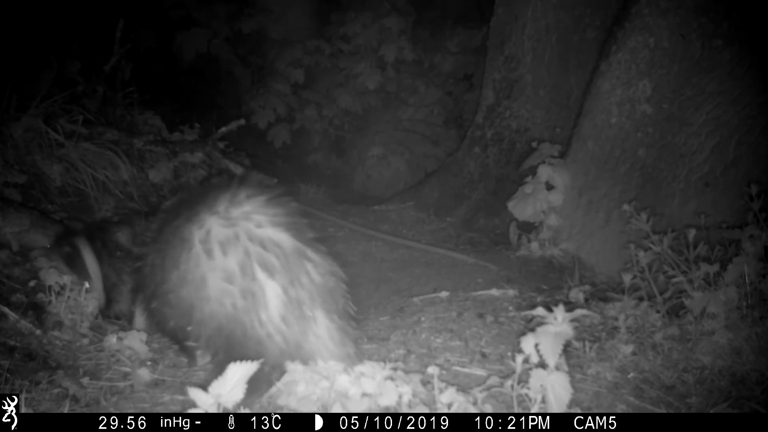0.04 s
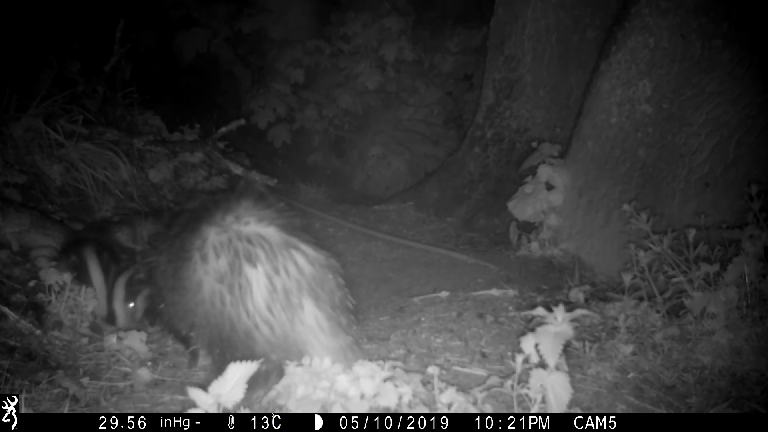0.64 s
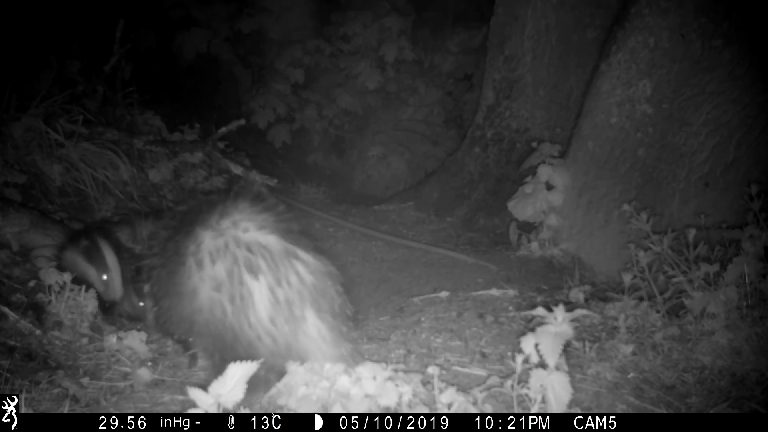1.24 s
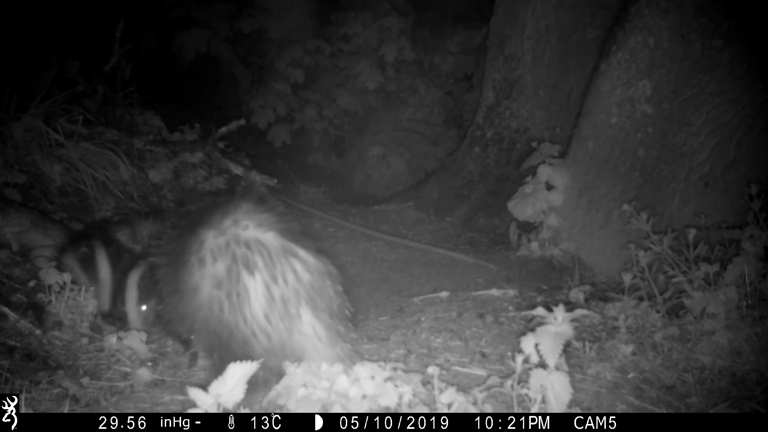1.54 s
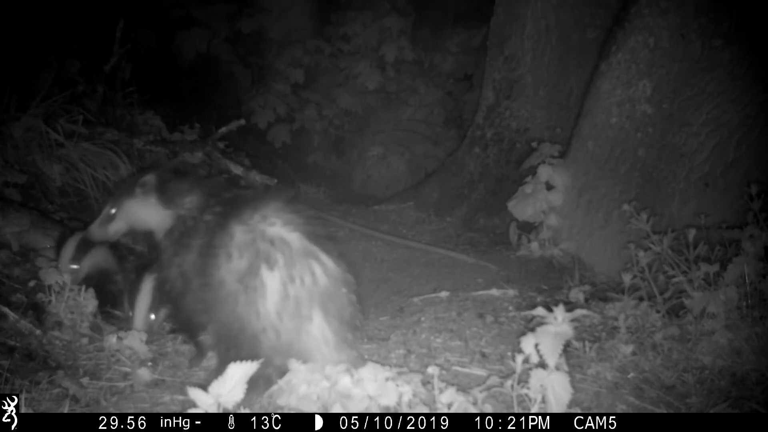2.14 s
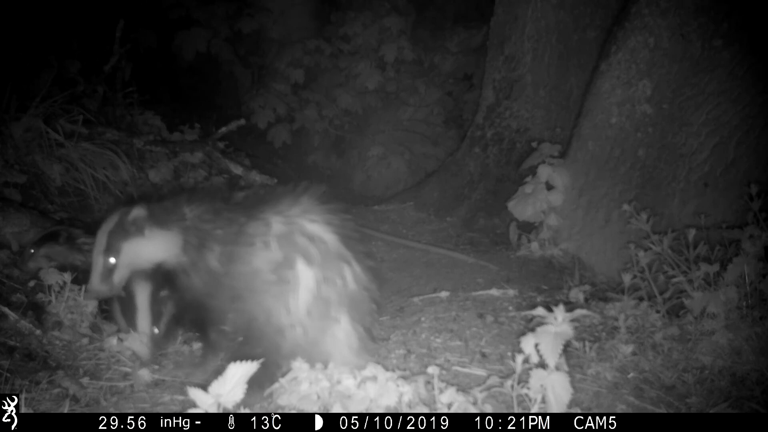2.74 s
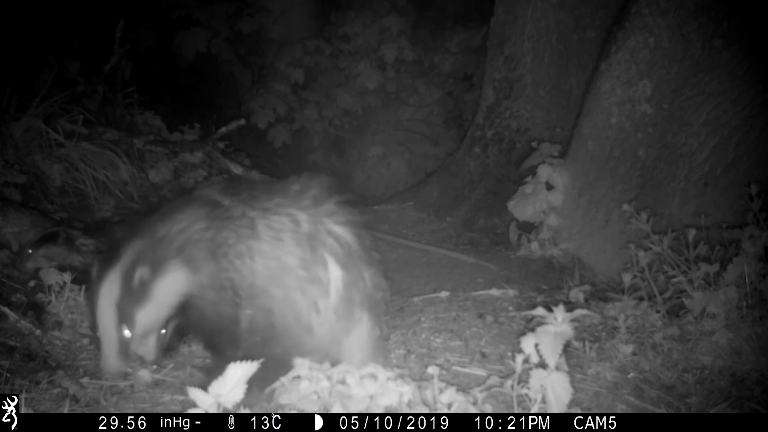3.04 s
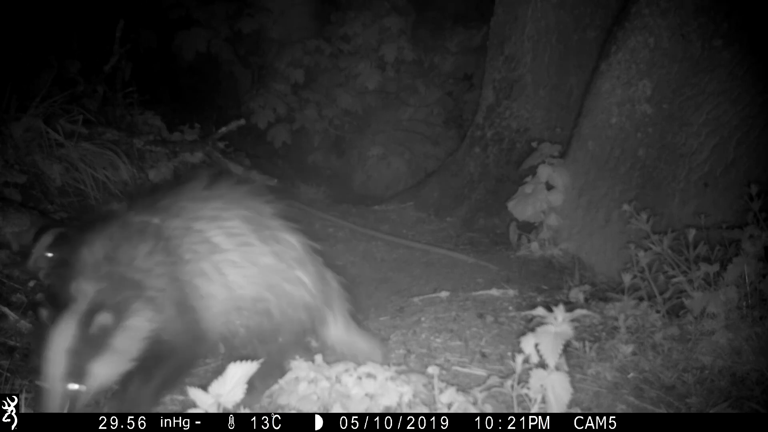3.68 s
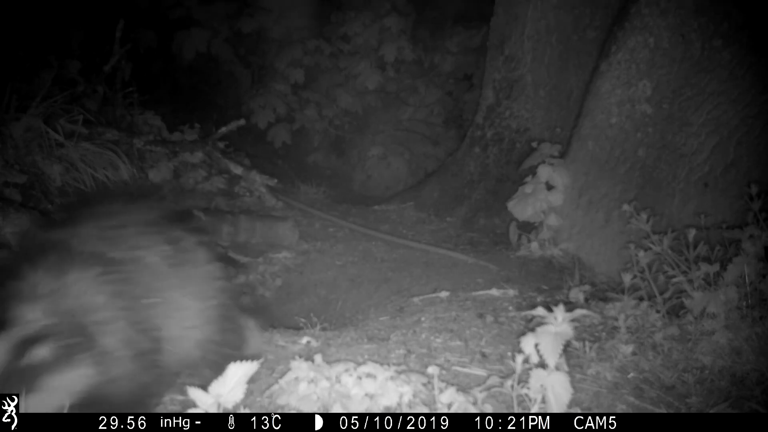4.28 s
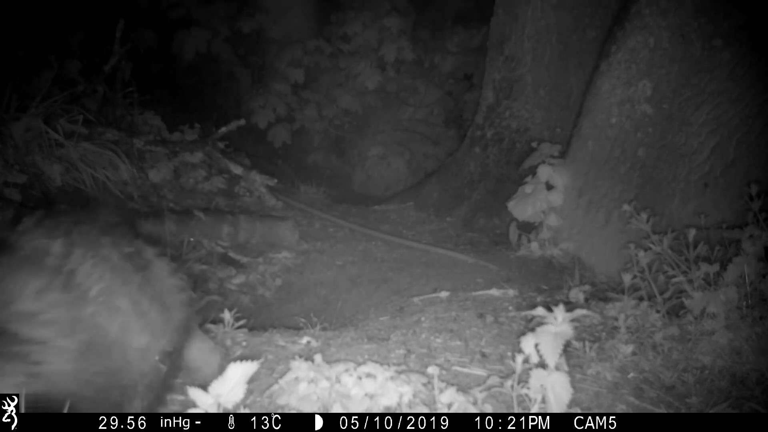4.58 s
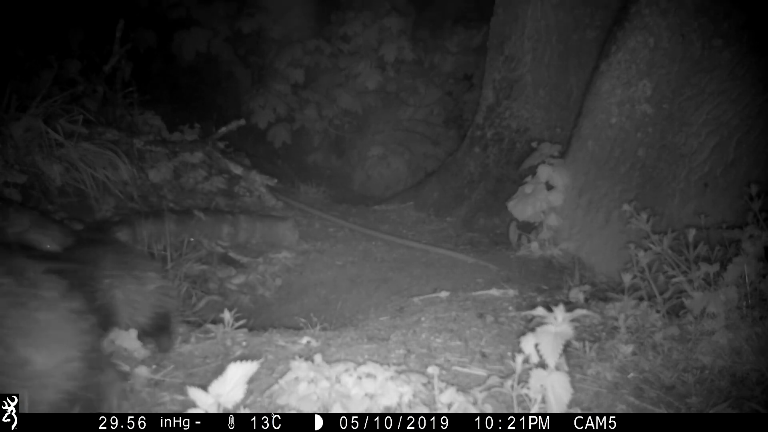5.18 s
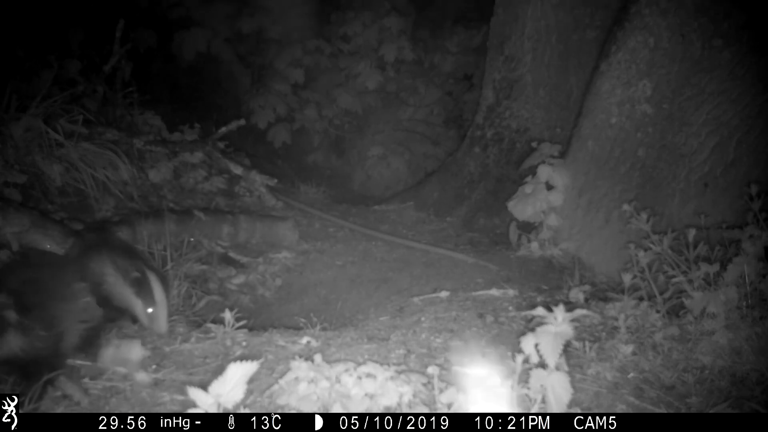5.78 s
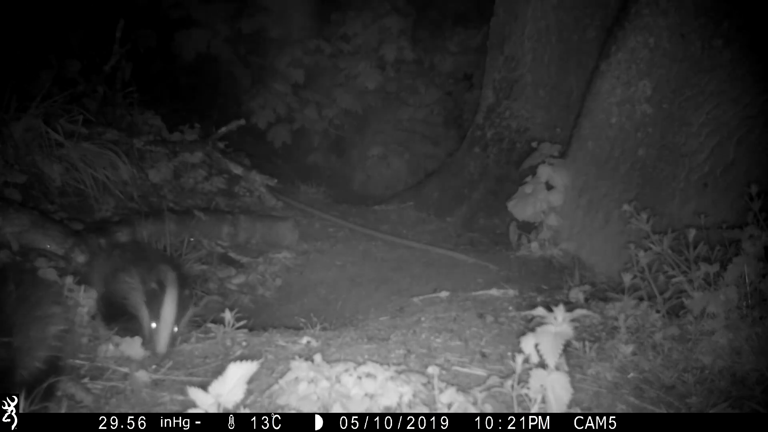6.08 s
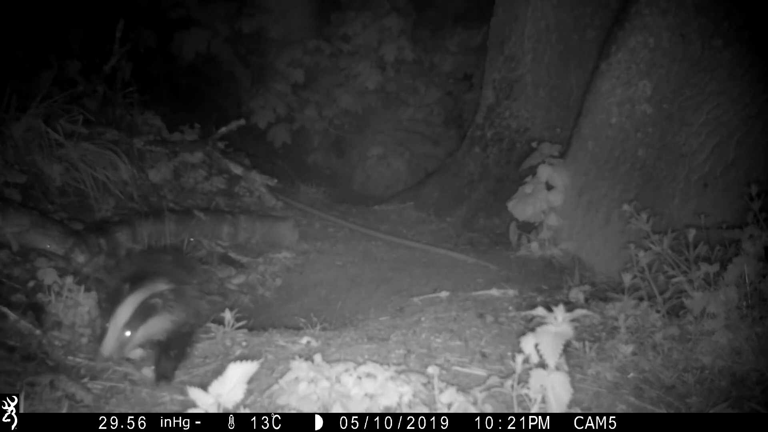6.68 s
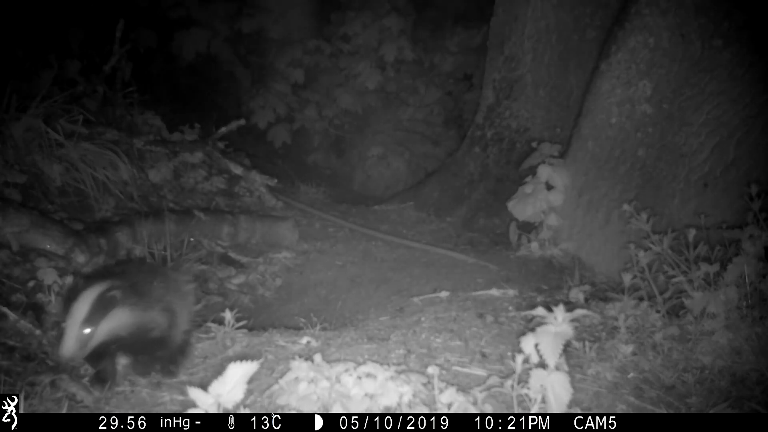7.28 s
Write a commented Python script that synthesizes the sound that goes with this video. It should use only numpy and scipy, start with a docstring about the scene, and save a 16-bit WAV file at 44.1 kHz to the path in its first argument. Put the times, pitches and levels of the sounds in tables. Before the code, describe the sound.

Small twig snaps and one raspy squeak come through the even hiss of a trail camera in a quiet wood at night. After a pause, young badgers nearby let out a harsh yap and four quick, clear yelps. They grunt quietly, crack a dry twig and scuff softly through leaves, yelping twice more near the end. The trees return a slight echo, and a thin electronic whine sits faintly underneath.

```python
"""Among trees at night, badger cubs squabble in front of a trail camera. Their vocal folds make seven
short, clear yelps, one harsh yap and a few low grunts. Their paws snap twigs and scuff dry leaves,
and the trees return a faint echo. The camera adds a steady hiss and a thin electronic whine."""
import sys
import numpy as np
from scipy import signal
from scipy.fft import rfft, irfft
from scipy.io import wavfile

SR = 44100
rng = np.random.default_rng(int(sys.argv[2]) if len(sys.argv) > 2 else 0)


def dump_mix(stems):
    """Bounce the given channels to the path in sys.argv[1] as a 16-bit WAV at rate SR."""
    frames = np.atleast_2d(stems).T  # one column per channel
    limited = np.clip(frames, -1, 1)  # hard clip at full scale
    pcm = np.round(limited * 32767).astype(np.int16)
    wavfile.write(sys.argv[1], SR, pcm)


N = 331632


def gain_of(db):
    """Turns decibels into a multiplier."""
    return 10 ** (np.asarray(db) / 20)


def evened(x):
    """Scales a signal to an average strength (rms) of 1."""
    return x / np.sqrt(np.mean(x ** 2) + 1e-20)


def level_at(curve, hz):
    """Looks up a level between the (frequency_hz, level_db) points of a curve."""
    points_hz, levels_db = np.transpose(curve)
    return np.interp(np.log(hz + 1), np.log(points_hz + 1), levels_db)


def add(mix, start_s, sound):
    """Mixes a sound in at its start time."""
    part = mix[round(start_s * SR):][:len(sound)]
    part += sound[:len(part)]


def coloured(x, curve):
    """Makes each frequency louder or softer, following a curve."""
    return irfft(rfft(x) * gain_of(level_at(curve, np.fft.rfftfreq(len(x), 1 / SR))), len(x))


def camera_hiss(level_db=-53):
    """The camera's own steady noise."""
    # tone of the hiss: frequency_hz, level_db
    colour = [(25, -19.5), (60, -12.5), (130, -11), (300, -5.5), (600, -3), (1100, 0.5), (1700, -6),
              (2600, -12), (3400, -17.5), (3900, -22), (5500, -33), (7000, -40.5), (9500, -44),
              (12500, -44), (13300, -67.5)]
    return gain_of(level_db) * evened(coloured(rng.standard_normal(N), colour))


def camera_whine(pitch_hz=7796.6, picture_hz=29.7, level_db=-77.5):
    """A thin electronic tone whose sign flips with the picture rate."""
    t = np.arange(N) / SR
    flips = np.tanh(20 * np.sin(2 * np.pi * picture_hz * t))
    return gain_of(level_db) * evened(flips * np.sin(2 * np.pi * pitch_hz * t))


def ringing(levels_db):
    """How an object rings after one tap, given its level at each frequency."""
    log_gain = np.log(gain_of(levels_db))
    return np.fft.ifft(np.exp(np.conj(signal.hilbert(log_gain)))).real


def twig_snap(level_db, ring_hz, dryness, fade_s=0.092):
    """A sharp crack and a brief splintering both ring the same piece of wood."""
    # tone of the wood: frequency_hz, level_db
    wood = [(150, -22.5), (600, -13), (1000, -3), (1350, -1), (2200, -3.5), (3200, -9), (4200, -14.5),
            (6000, -22.5), (8000, -37), (14000, -40), (17000, -61)]
    t = np.arange(SR // 6) / SR
    splinter_db = np.interp(dryness, [0, 1], [-6.5, -24.5])  # damp twigs splinter on after the crack
    force = 0.22 * gain_of(splinter_db - 60 * t / fade_s) * rng.standard_normal(len(t))
    force[0] = 1  # the crack
    # dry twigs snap more brightly, and so do thin, high-ringing ones
    treble_db = np.interp(dryness, [0, 1], [-10, 5.5]) + 3 * np.log2(ring_hz / 2000)
    hz = abs(np.fft.fftfreq(2048, 1 / SR))
    ring_db = 9 / (1 + ((hz / ring_hz - 1) / 0.16) ** 2)
    body = ringing(level_at(wood, hz) + level_at([(1500, 0), (5000, treble_db)], hz) + ring_db)
    return gain_of(level_db) * signal.fftconvolve(force, body / abs(body).max())


def leaf_scuff(length_s, level_db, cracks_per_s=1500, spread_db=4):
    """A paw crushes dry leaves: many tiny cracks of unequal size."""
    # tone of the leaves: frequency_hz, level_db
    leaves = [(300, -7), (1300, 2.5), (3000, -3), (4200, -7), (5800, -15.5), (7500, -25), (12000, -29.5),
              (16000, -43.5)]
    size = round(length_s * SR)
    cracks = rng.standard_normal(size) * (rng.random(size) < cracks_per_s / SR)
    cracks *= gain_of(spread_db * np.minimum(rng.exponential(1, size), 4))
    return gain_of(level_db) * evened(coloured(cracks, leaves)) * np.sin(np.linspace(0, np.pi, size))


def wobble(size, rate_hz):
    """A smooth, random wavering."""
    return evened(coloured(rng.standard_normal(size), [(rate_hz, 0), (2 * rate_hz, -30), (4 * rate_hz, -90)]))


def pitch_arch(length_s, top_hz, start_share, end_share, top_at):
    """One push of air: the pitch rises and sinks. Its stage runs from -1 through 0 (the top) to 1."""
    progress = np.linspace(0, 1, round(length_s * SR))
    stage = np.interp(progress, [0, np.clip(top_at, .1, .9), 1], [-1, 0, 1])
    drop = np.where(stage < 0, 1 - start_share, 1 - end_share)
    return top_hz * (1 - drop * stage ** 2), stage


def air_puffs(cycles):
    """A puff of air escapes each time the vocal folds open."""
    # tone of the rasping air: frequency_hz, level_db
    rasp = [(300, -16), (800, -14.5), (1700, 4.5), (2300, -5.5), (2900, -0.5), (3400, -11), (3900, -32.5),
            (6000, -31.5), (8000, -44), (14000, -66.5)]
    puffs = np.exp(-(cycles % 1) / 0.24) * rng.standard_normal(len(cycles))
    return evened(coloured(puffs, rasp))


def low_cut(x, hz):
    """A small mouth gives off no bass."""
    return signal.sosfilt(signal.butter(2, hz, "high", fs=SR, output="sos"), x)


def yelp(length_s, rise_s, top_hz, level_db, second_db, higher_db, hoarseness):
    """A high, almost pure call. The vocal folds flutter before they settle and as the air runs out."""
    # tone of the overtones: frequency_hz, level_db
    colour = [(900, -9.5), (1700, 2.5), (2050, -6), (2400, 1.5), (2600, -4.5), (2850, -4.5), (3250, -8),
              (3450, -9), (3700, -25.5), (4600, -25), (5800, -23.5), (7000, -38.5), (10500, -58)]
    hz, stage = pitch_arch(length_s, top_hz, 1 - 14.5 * rise_s, end_share=.53, top_at=rise_s / length_s)
    swell_db = -22 * np.maximum(-stage, 0) ** 2.96
    hold = 0.38  # share of the pitch's fall before the yelp fades
    fade_db = -22.5 * np.maximum(stage - hold, 0) / (1 - hold)
    loudness = gain_of(swell_db + fade_db) * signal.windows.tukey(len(hz), .08)
    rough_start = hoarseness * np.clip(-2 * stage, 0, 1) ** 2
    rough_end = 0.55 * np.clip(1.215 * stage, 0, 1) ** 3
    rough = np.clip(0.012 + 0.25 * hoarseness + rough_start + rough_end, 0, 1)
    cycles = np.cumsum(hz * (1 + (0.0031 + .08 * rough) * wobble(len(hz), 600))) / SR
    overtones = sum(gain_of(level_at(colour, k * hz) + (second_db if k == 2 else higher_db))
                    * np.cos(2 * np.pi * k * cycles) for k in range(2, 10))
    overtones *= gain_of(6.4 * np.minimum(rough, .6))  # slapping folds are richer in overtones
    half_pitch = np.cos(np.pi * cycles)
    flutter = 1 + rough * (0.46 * half_pitch + 0.42 * wobble(len(hz), 940))
    tone = (np.cos(2 * np.pi * cycles) + overtones) * flutter
    air = gain_of(2.0 + 0.42 * higher_db) * rough ** 1.6 * air_puffs(cycles)  # a pressed voice rasps more
    voice = (1 - .75 * rough ** 2) * tone + air
    return gain_of(level_db) * np.sqrt(2) * low_cut(voice * loudness, 500)


def chest_call(throat, bend, length_s, top_hz, level_db, rough, air_db, ends_db):
    """Slower, uneven pulses of the vocal folds ring the throat, each with a puff of air."""
    hz, stage = pitch_arch(length_s, top_hz, *bend)
    loudness = gain_of(ends_db * abs(stage) ** 1.25) * signal.windows.tukey(len(hz), .15)
    cycles = np.cumsum(hz * (1 + .15 * rough * wobble(len(hz), 250))) / SR
    colour = [(3200, -1.5), (3800, -6), (6500, -13), (8000, -40)]  # frequency_hz, level_db
    folds = sum(gain_of(level_at(colour, k * hz)) * np.cos(2 * np.pi * k * cycles) for k in range(1, 15))
    rasp = np.exp(-(cycles % 1) / 0.26) * wobble(len(hz), 1700)
    buzz = evened(folds) + 2.4 * rough * rasp
    voice = sum((-1) ** k * gain_of(db) * signal.lfilter(*signal.iirpeak(f, f / width, SR), buzz)
                for k, (f, width, db) in enumerate(throat))
    voice = evened(low_cut(voice, 0.72 * top_hz))
    return gain_of(level_db) * loudness * (voice + gain_of(air_db) * air_puffs(cycles))


def yap(length_s, top_hz, level_db, rough):
    """A harsh call through an open throat."""
    # where the open throat rings: frequency_hz, width_hz, level_db
    throat = [(380, 85, -15.5), (1050, 255, 3), (1520, 270, 2), (2310, 400, -7), (2930, 780, -18),
              (5070, 1400, -24.5)]
    # pitch bend: start_share and end_share of the top pitch, top_at (0-1)
    bend = (.75, .88, .57)
    return chest_call(throat, bend, length_s, top_hz, level_db, rough, air_db=-15, ends_db=-14)


def grunt(length_s, top_hz, level_db):
    """A low call, muffled by a shut throat."""
    # where the shut throat rings: frequency_hz, width_hz, level_db
    throat = [(180, 52, -11), (351, 140, -7), (585, 135, 0.5), (1400, 450, -17.5), (1890, 460, -30.5)]
    # pitch bend: start_share and end_share of the top pitch, top_at (0-1)
    bend = (.93, 0.85, .33)
    return chest_call(throat, bend, length_s, top_hz, level_db, rough=0.45, air_db=-23, ends_db=-9.5)


def light_steps(start_s=6.0, end_s=7.4, count=6):
    """A cub walks up, stirring the leaves at an uneven pace."""
    walk = np.zeros(N)
    pace_s = (end_s - start_s) / count
    for k, late in enumerate(rng.random(count)):
        add(walk, start_s + pace_s * (k + late / 2), leaf_scuff(length_s=0.18, level_db=-65.5))
    return walk


def with_echo(sound, fade_s=0.34, echoes_per_s=2000):
    """Adds a few near echoes, then a thin tail scattered by trunks and leaves."""
    # echoes from the ground and near trunks: delay_s, level_db
    near_echoes = [(.0045, -24), (.0095, -18.5), (0.0139, -19.5)]
    # tone of the tail: frequency_hz, level_db
    colour = [(200, -14.5), (600, -8.5), (1150, -9.5), (1800, -7.5), (2200, 4.5), (2400, -1), (2600, -2.5),
              (3200, 0), (8000, -5)]
    t = np.arange(SR // 2) / SR
    tail = rng.choice([-1., 1.], len(t)) * (rng.random(len(t)) < echoes_per_s / SR)
    tail *= gain_of(-60 * t / fade_s) * (1 - np.exp(-t / .008))
    echo = gain_of(-17) * coloured(tail / np.linalg.norm(tail), colour)
    for delay_s, level_db in near_echoes:
        add(echo, delay_s, gain_of([level_db]))
    return sound + signal.fftconvolve(sound, echo)[:N]


def scene():
    """The cubs' voices and paws among the trees."""
    # clear yelps: start_s, length_s, rise_s, top_pitch_hz, level_db, second_harmonic_db,
    # higher_harmonics_db, hoarseness (0-1)
    yelps = [(1.452, .039, .016, 1191, -23.5, -7, -10, 0.97),
             (3.9744, .039, .0107, 1136, -27, -4.5, -17, 0.15),
             (4.143, 0.033, 0.01, 1165, -27, -1.5, -13, .12),
             (4.831, 0.033, .0152, 1175, -20, -14, -28.5, .08),
             (5.048, .049, .026, 1261, -20, -5.5, -25.5, 0.04),
             (6.823, .036, 0.011, 948, -29.5, -2, -23.5, 0.04),
             (7.128, .041, 0.013, 1151, -21.5, -5.5, -21.5, 0.02)]
    # the harsh yap: start_s, length_s, top_pitch_hz, level_db, roughness (0-1)
    one_yap = (3.692, .034, 533.5, -21, .33)
    # low grunts: start_s, length_s, top_pitch_hz, level_db
    grunts = [(4.764, .035, 327.2, -37), (5.609, .04, 333, -38.5), (5.636, 0.0484, 339, -38),
              (6.55, 0.053, 183.4, -42)]
    # twigs snapping under paws: start_s, level_db, ring_hz, dryness (0-1)
    twigs = [(.616, -36.5, 1700, .25), (.742, -26.5, 2140, 0.23), (1.202, -38, 3100, .35),
             (1.343, -34, 3000, 0.2), (1.7008, -33, 1770, .4), (5.641, -20, 1250, 0.8),
             (5.7092, -32, 3520, 0.9), (5.881, -41, 2300, 0), (5.919, -35, 1330, 0.18),
             (6.877, -43, 3900, 0.7), (7.504, -38.5, 2900, .45)]
    # paws pushing through leaves: start_s, length_s, level_db
    scuffs = [(1.196, .03, -60), (1.518, 0.018, -55.5), (4.64, .29, -64), (5.461, .12, -60.5),
              (5.861, .15, -58.5), (6.686, 0.042, -56), (6.759, .11, -59.5)]
    cubs = np.zeros(N)
    for source, events in [(yelp, yelps), (yap, [one_yap]), (grunt, grunts),
                           (twig_snap, twigs), (leaf_scuff, scuffs)]:
        for start_s, *settings in events:
            add(cubs, start_s, source(*settings))
    return with_echo(cubs + light_steps())[None]


def record(dry):
    """The camera adds its hiss and whine and cuts off the highest treble."""
    low_pass = signal.firwin(511, cutoff=15500, window=("kaiser", 9), fs=SR)
    return signal.oaconvolve(dry + camera_hiss() + camera_whine(), low_pass[None], "same")


dry = scene()
out = record(dry)
dump_mix(out)
```